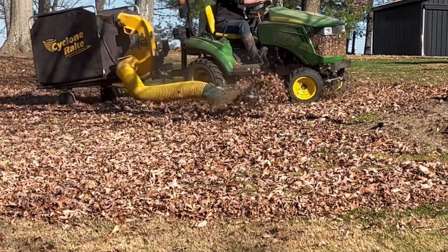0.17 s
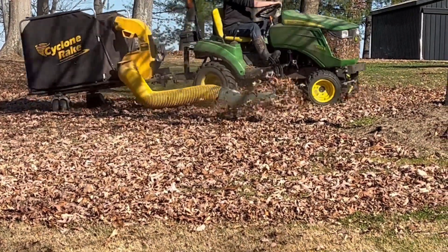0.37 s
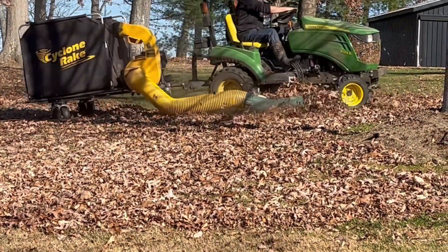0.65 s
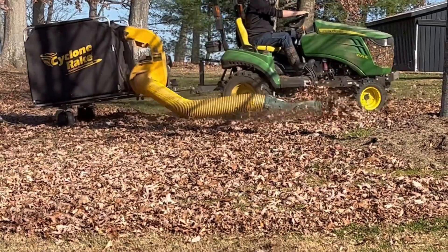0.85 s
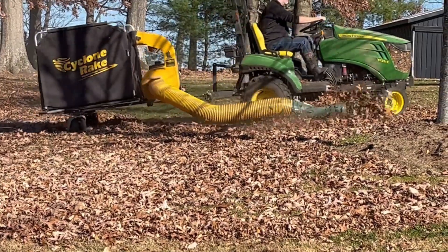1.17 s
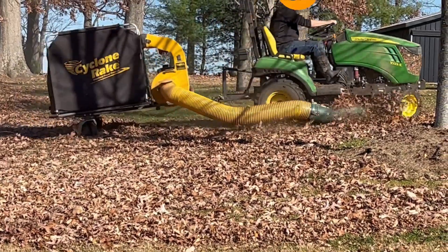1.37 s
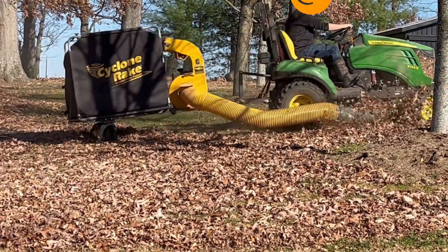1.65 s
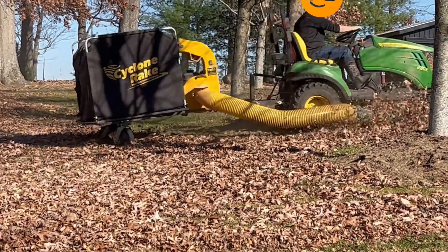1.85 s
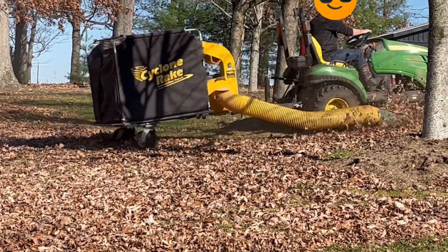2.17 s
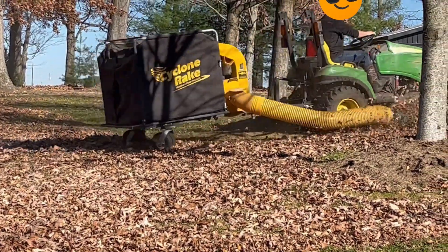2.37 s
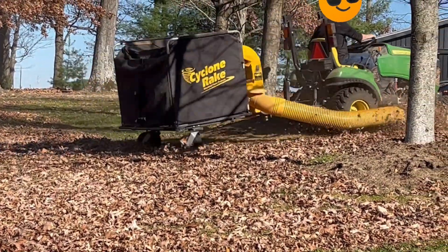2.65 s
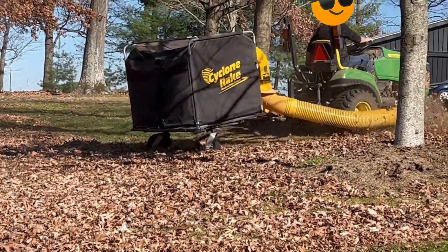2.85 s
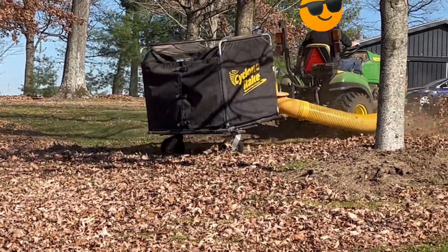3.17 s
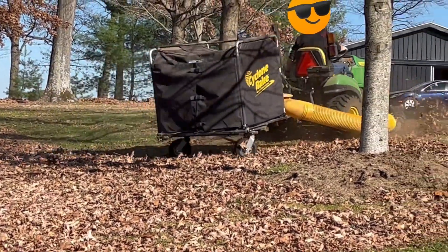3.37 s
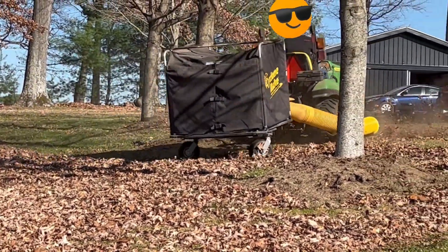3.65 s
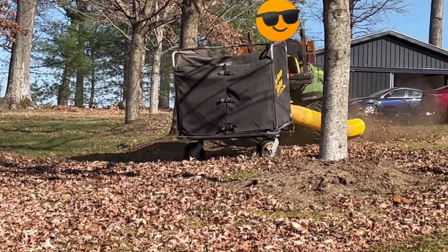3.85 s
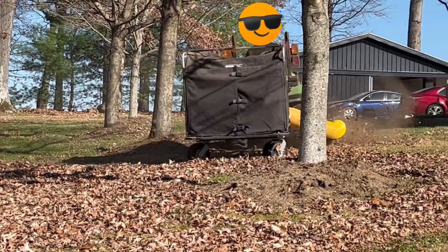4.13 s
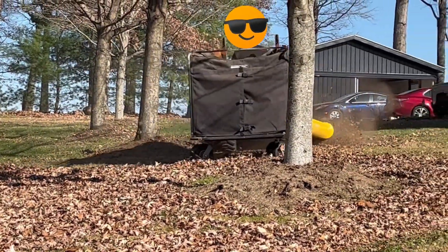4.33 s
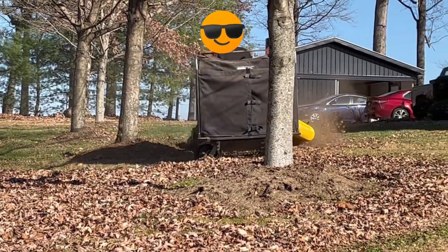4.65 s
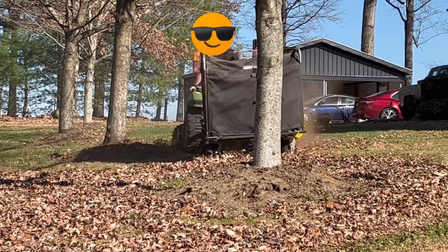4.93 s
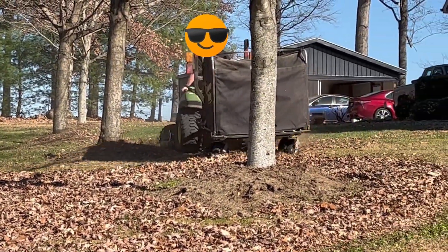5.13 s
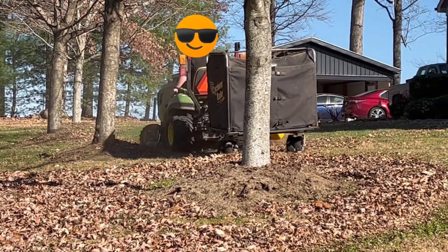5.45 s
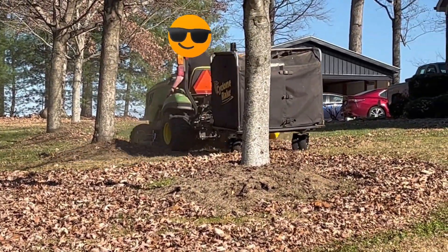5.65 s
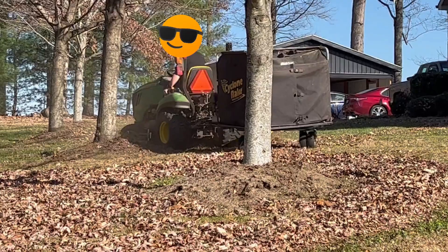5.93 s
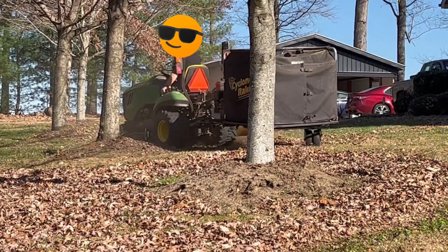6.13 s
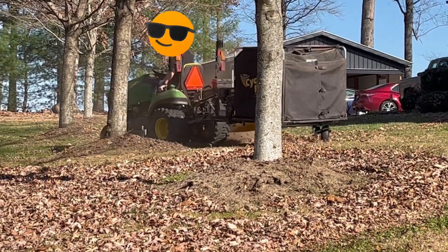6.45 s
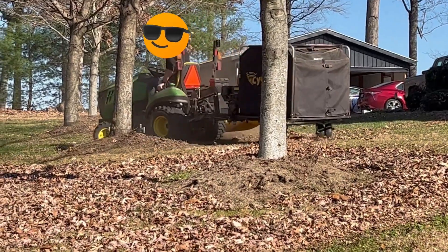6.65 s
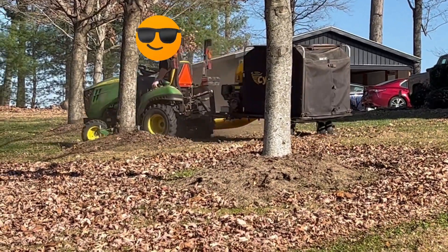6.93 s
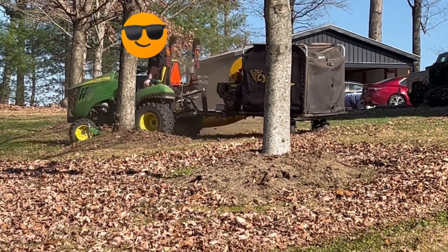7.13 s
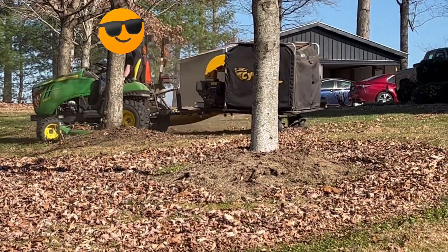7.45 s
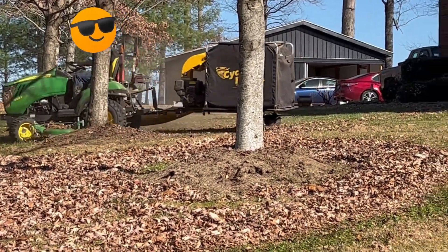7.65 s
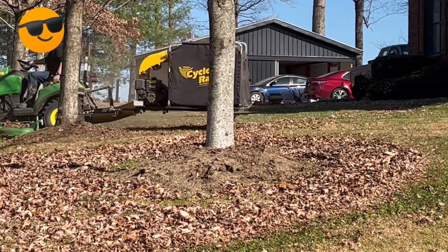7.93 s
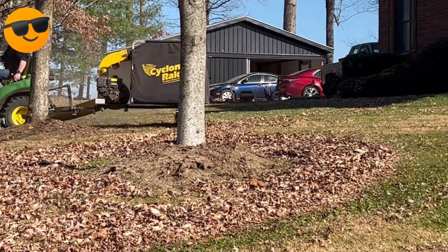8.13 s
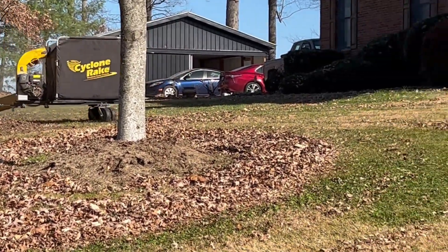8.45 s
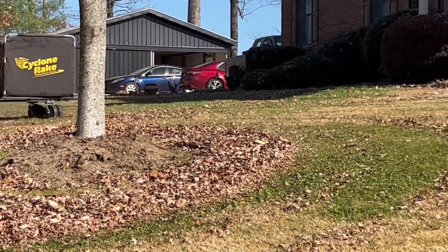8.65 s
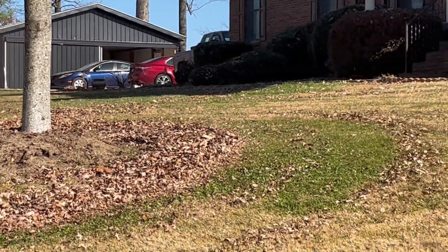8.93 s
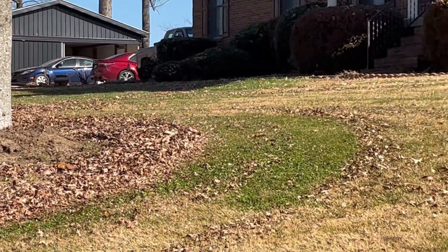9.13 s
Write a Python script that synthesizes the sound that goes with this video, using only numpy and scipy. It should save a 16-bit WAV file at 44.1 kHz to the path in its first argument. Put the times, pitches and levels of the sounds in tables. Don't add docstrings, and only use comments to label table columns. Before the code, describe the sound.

A lawn tractor towing a leaf vacuum drones and whooshes around a tree outdoors, dry leaves crackling, metal rattling, wind buffeting the microphone.

```python
import sys
import numpy as np
from scipy import signal
from scipy.fft import rfft, irfft, next_fast_len
from scipy.io import wavfile
from scipy.ndimage import uniform_filter1d, map_coordinates

SR = 44100
rng = np.random.default_rng(int(sys.argv[2]) if len(sys.argv) > 2 else 0)


def how_loud(loudness_db):
    steps = np.asarray(loudness_db, float) / 20
    return 10 ** steps


def generate_wav(sig):
    pcm = np.round(np.clip(np.atleast_2d(sig).T, -1, 1) * 32767).astype(np.int16)
    wavfile.write(sys.argv[1], SR, pcm)


N = 409688
TIME = np.arange(N) / SR


def turns():
    # t/s, blade pass f/Hz, vacuum firing f/Hz
    speed = [(0, 106.6, 29.02), (.71, 106.6, 29.044), (2.14, 106.15, 29.044), (3.3, 106.03, 29.04),
             (4.5, 106.25, 29), (5.72, 106.34, 29), (7.15, 107.02, 29.015), (7.86, 107.1, 29.033),
             (8.58, 107.41, 29.096), (9.29, 107.45, 29.213)]
    # t/s, lead/firings
    ahead = [(0, .63), (4.3, .6), (5.3, .83), (7.3, .98), (8.4, 1.15), (9.29, 1.4)]
    passes_per_firing = 1.352
    blade, vac = np.cumsum(curves(speed), axis=1) / SR
    return blade, blade / passes_per_firing + curves(ahead)[0], vac


def deck(blade):
    # t/s, level/dB
    first = [(0, -17.5), (.4, -23.5), (.75, -31.5), (1.3, -28), (1.95, -19.5), (2.4, -18), (2.95, -17.5),
             (3.5, -22), (3.97, -28), (4.5, -21.5), (5.45, -16), (6.4, -14.5), (6.8, -20.5), (7.35, -30.5),
             (7.7, -36.5), (8.1, -27), (9.29, -28)]
    # multiple, level above the 4th/dB
    upper = [(6, -14), (7, -20), (8, -17), (9, -14), (10, -18), (11, -19.5), (13, -12.5), (14, -16)]
    # multiple, middle t/s, length/s, peak level/dB
    in_step = [(2, 0.16, 0.61, -26), (2, 1.923, 0.63, -24), (2, 3.6, 0.15, -27), (2, 4.14, 0.58, -26.5),
               (2, 5.1, 0.88, -31), (2, 6.45, 0.59, -33), (2, 8.1, 0.45, -31.5), (3, 1.13, 0.71, -33),
               (3, 2.25, .3, -42), (3, 2.97, 0.29, -37.5), (3, 4.51, 0.81, -35), (3, 6.3, 0.42, -40.5),
               (3, 8.25, 0.61, -34.5), (4, 0.09, 0.44, -34), (4, 1.46, 0.64, -39.5), (4, 2.62, 0.34, -39.5),
               (4, 5.24, 0.27, -45), (4, 7.45, 0.9, -40.5), (4, 8.3, .5, -41), (5, .1, .4, -52),
               (5, 1.1, 0.33, -46), (5, 1.68, 0.5, -40.5), (5, 3.38, 0.47, -48), (5, 5.8, 1, -49),
               (5, 8.2, 0.28, -46), (4, 9.15, .2, -41), (2, 7.15, .5, -35.5), (2, 9.2, .2, -33.5),
               (2, 1.02, 0.44, -33), (2, 3.22, 0.24, -35), (6, 0.67, 0.27, -48), (6, 1.9, 0.61, -46),
               (6, 3.4, .15, -44.5), (6, 4, .2, -46.5), (6, 4.7, .3, -46.5), (6, 5.8, .15, -44),
               (8, 4.6, .14, -45), (8, 4.3, 0.18, -47), (8, 5.22, 0.24, -43.5), (9, 5.06, .4, -47),
               (9, 4.1, .8, -51)]
    out_of_step_db = [-39.5, -43, -60, -54]
    sides_db = [-28, -20, -14, -13, -10]

    size = {k + 2: how_loud(db) + 0 * TIME for k, db in enumerate(out_of_step_db)}
    for k, s, length, db in in_step:
        k = round(k)
        size[k] = np.maximum(size.get(k, 1e-5), how_loud(db) * swell(s, length))
    level_db = {k: 20 * np.log10(g) for k, g in size.items()}

    out = 0
    low_db = curves(first) + [level_db[k] for k in range(2, 6)]
    for k, (db, side_db) in enumerate(zip(low_db, sides_db), 1):
        out = out + tone(k * blade, db, flutter_db=0.5, side_db=side_db)
    for k, db in upper:
        follow_db = (low_db[3] - 39.0) / 2 + db + 3 * wobble(2.0)
        top_db = np.maximum(follow_db, level_db.get(round(k), -99))
        out = out + tone(k * blade, top_db, flutter_db=1.5, side_db=-6)
    return out


def diesel(fired):
    # t/s, level/dB
    exhaust = [(0, -21), (.7, -21), (1.4, -20.5), (2.3, -25.5), (2.7, -29.5), (3.5, -25.5), (4.2, -30.5),
               (4.6, -20.5), (5, -26.5), (5.5, -27), (5.85, -28), (6.5, -25.5), (7, -32), (7.5, -37),
               (7.9, -29.5), (9.29, -29)]
    # t/s, level/dB
    knocking = [(0, -41.5), (2, -44.5), (3.5, -58), (4.3, -56), (5.5, -60), (7, -46), (7.7, -41.5),
                (8.4, -39), (9.29, -38.5)]
    # f/Hz, width/Hz, level/dB
    block = [(2800, 120, 4.5), (3354, 160, 5), (3790, 680, 3.5), (4620, 1400, -3.5)]
    # (middle t/s, length/s, level/dB)
    panels = [(1388, 47, [(2.2, 0.93, -45), (7.3, 1.5, -46.5)]), (1501, 40, [(.9, 1.3, -49),
              (2.2, 0.37, -40), (2.85, 0.32, -48), (7.2, 1.3, -44)]), (1743, 53, [(.17, 0.54, -47),
              (1.6, 1.6, -55), (5.8, .5, -48), (7.1, 1.2, -45), (8.95, .8, -47)]),
              (1830, 27, [(1.3, 0.81, -55), (2.75, 0.26, -46)]), (1970, 240, [(5.3, 0.12, -41),
              (8.95, 1.1, -48)]), (2850, 45, [(.6, 1.2, -49), (5.9, .5, -59), (6.65, 0.27, -58),
              (7.05, .4, -53)]), (3390, 240, [(8.25, .55, -44), (8.68, 0.13, -43), (9.05, 0.37, -51)]),
              (3750, 260, [(5.9, 0.4, -54), (6.25, 0.45, -53), (7.85, 0.62, -45.5), (8.7, 0.56, -46),
              (9.25, 0.13, -41)]), (6250, 400, [(3.93, .15, -49)]), (6810, 350, [(3.76, .25, -45),
              (7.2, .67, -50.5), (8, 0.25, -48), (8.25, .5, -51)]), (7050, 270, [(.4, .27, -50),
              (6.2, 0.8, -48.5), (7.7, 0.39, -47), (9.05, 0.82, -47)])]

    knock_db, = curves(knocking)
    second_db = -37 + 0.44 * (knock_db - knock_db.mean()) + 1.3 * wobble(2.6)
    hum = tone(fired, curves(exhaust)[0], flutter_db=-1.3, side_db=-32)
    hum += tone(2 * fired, second_db, flutter_db=1.0, side_db=-35)
    hum += tone(3 * fired, second_db - 11.5, flutter_db=5.0, side_db=-15)

    knock = how_loud(knock_db) * spread(puffs(fired, sharp=0.73), modes(block))
    shake = spread(puffs(fired, sharp=3.3), lambda hz: 1)
    flecks = how_loud(2.2 * wobble(16))
    for hz, width, spells in panels:
        ring = signal.lfilter(*signal.iirpeak(hz, hz / width, SR), shake)
        ring = signal.lfilter(*signal.iirpeak(hz, hz / width / 2, SR), ring)
        facing = sum(how_loud(db) * np.exp(-(1.88 * (TIME - s) / length) ** 4) for s, length, db in spells)
        knock += flecks * unit(ring) * facing
    return hum + knock


def vacuum(fired):
    # t/s, tone level/dB, octave level/dB
    shaft = [(0, -36, -33), (1.16, -40, -31), (2, -33, -32), (2.9, -32, -40), (3.6, -29, -49),
             (4.3, -44, -45), (4.9, -42, -44), (5.4, -32, -42), (6, -31, -34), (6.8, -40, -37),
             (7.55, -45, -40), (8.3, -35, -40), (8.8, -32, -34), (9.29, -33, -30)]
    # multiple of firing, level/dB
    teeth = [(3, -47), (5, -18.5), (6, -27), (7, -20), (8, -29), (10, -33), (13, -35), (14, -36.5),
             (18, -40), (20, -46), (24, -57)]
    comb_db = -39 + 4 * wobble(1.595)
    shaft_db, octave_db = curves(shaft)
    out = tone(2 * fired, shaft_db, flutter_db=0.0, side_db=-22)
    out += tone(4 * fired, octave_db, flutter_db=-1.0, side_db=-30)
    for k, rel_db in teeth:
        out += tone(k * fired, comb_db / 2 + rel_db + 2 * wobble(1.96), flutter_db=-1.5, side_db=-36)
    return out


def whines(blade, fired):
    # t/s, level/dB
    pump_level = [(0, -57), (1.6, -52), (3.5, -55), (4.35, -54), (4.55, -46), (4.75, -49), (4.95, -55),
                  (5.2, -47), (5.6, -41.5), (5.92, -44), (6.08, -56), (6.8, -55), (6.95, -48), (7.45, -47),
                  (7.65, -56), (9.29, -55)]
    # t/s, level/dB
    gear_level = [(0, -52), (.6, -50), (1.1, -53), (1.3, -46), (1.6, -43), (1.95, -47), (2.2, -41.5),
                  (2.4, -46), (2.5, -70)]
    # t/s, f/Hz, level/dB
    squeal = [
        (5.94, 2250, -60),
        (5.96, 2290, -44),
        (5.985, 2360, -39),
        (6.01, 2450, -48),
        (6.05, 2380, -54),
        (6.09, 2370, -44),
        (6.125, 2440, -39),
        (6.175, 2430, -45),
        (6.2, 2430, -65),
    ]
    pump_beats, gear_beats = 7.81, 28.07
    pump = tone(pump_beats * blade + 0.04 * wobble(20), curves(pump_level)[0], flutter_db=1, side_db=-12)
    gear = tone(gear_beats * fired, curves(gear_level)[0], flutter_db=1.5, side_db=-27)
    belt_hz, belt_db = curves(squeal)
    belt_cycles = np.cumsum(belt_hz + 55 * wobble(220)) / SR
    belt = tone(belt_cycles, belt_db - 1 + 3 * wobble(60), flutter_db=1, side_db=-20)
    return pump + belt + gear


def rattles(fired):
    # t/s, peak level/dB, f/Hz
    raps = [(5.7145, -32, 3760), (5.7908, -35, 3710), (5.9559, -33, 3710), (6.0188, -34, 3730),
            (6.1086, -24.5, 3730), (6.2478, -32, 3770), (6.3236, -31, 3650), (6.4143, -28, 3680),
            (7.6117, -24, 3400), (7.6746, -29, 3660), (7.7508, -28, 3440), (7.9011, -25, 3820),
            (7.953, -25, 3790), (8.0403, -28, 3690), (8.0527, -25, 3850), (8.1281, -26, 3390),
            (8.4038, -30, 3350), (8.5551, -25, 3420), (8.617, -27, 3400), (8.6299, -27, 3810),
            (8.6668, -27, 3700), (8.7068, -22, 3390), (8.7796, -29, 3710), (8.8055, -26, 3710),
            (8.8553, -26, 3730), (8.8799, -25, 3770), (8.9173, -26, 3410), (8.9931, -27, 3350),
            (9.0181, -28, 3680), (9.0445, -28, 3370), (9.2071, -26, 3780), (5.8672, -33, 3710),
            (5.9186, -34, 3740), (5.9815, -33, 3730), (6.1346, -33, 3750), (6.1486, -31, 3730),
            (6.1725, -31, 3740), (6.2878, -32, 3730), (6.3002, -29, 3720), (6.606, -34, 3690),
            (6.6879, -35, 3690), (5.6837, -33, 2830), (5.9431, -28, 2830), (6.5537, -36, 2830),
            (6.5906, -33, 2780), (6.641, -30, 2790), (6.855, -29, 2780), (6.8919, -31, 2840),
            (7.0086, -30, 2850), (7.1169, -30, 2850), (7.1603, -30, 2800), (9.282, -23, 3740),
            (8.675, -25, 2740)]
    # t/s, peak level/dB, f/Hz
    clanks = [(7.5898, -24.5, 2150), (7.6202, -32, 1870), (8.18, -23, 2040), (8.2533, -32, 2060),
              (8.5581, -30, 1920), (8.6733, -22, 1770), (8.7766, -31, 1780), (8.8145, -29, 1750),
              (8.9093, -29, 1970), (9.1153, -27, 1960), (.03, -22.5, 1710), (.235, -24, 1740),
              (8.605, -25, 1760), (9.005, -28, 1790), (9.065, -28, 1720), (9.14, -24, 1770),
              (9.18, -22, 1750), (9.215, -24, 1680), (9.24, -25, 1780)]
    # t/s, peak level/dB, f/Hz
    ticks = [(5.8795, -39, 6850), (5.9569, -37, 6990), (6.0067, -39, 6940), (6.0826, -39, 7180),
             (6.097, -37, 6830), (6.1729, -39, 6880), (6.1973, -38, 7080), (6.2347, -38, 6910),
             (6.2622, -38, 7090), (6.2861, -37, 7010), (6.3255, -39, 7150), (6.337, -37, 7110),
             (6.3639, -35, 6890), (6.3754, -35, 6860), (6.4133, -33, 6860), (6.4782, -39, 6860),
             (6.5395, -40, 6960), (6.5735, -41, 6920)]
    # t/s, peak level/dB
    thuds = [
        (2.599, -13),
        (6.728, -14),
    ]
    # beats per firing, middle t/s, length/s, level/dB
    mesh = [(13.32, 1.9, .6, -50), (19.2, 1.9, .9, -49), (28, .6, .4, -50), (10.55, 2.1, .15, -45),
            (23.33, 1.5, .6, -50), (23.2, 2.8, .2, -47), (36.1, 7.05, .15, -50), (35.9, 5.75, .12, -50)]
    out = how_loud(-3.5) * struck(raps, t60=0.065)
    out += how_loud(-7) * struck(clanks, t60=0.17)
    out += how_loud(7.5) * struck(ticks, t60=0.02)
    out += struck([(s, db, 110) for s, db in thuds], t60=0.05)
    song = 0
    for k, s, length, db in mesh:
        song = song + swell(s, length) * tone(k * fired + 0.042 * wobble(14), db, flutter_db=2.5, side_db=-18)
    return out + song


def air(fired):
    # t/s, loss with distance/dB, shade of the bag/dB, load of leaves/dB
    path = [(0, -1, 1, -2.5), (1.3, 0, -1, -2.5), (2.56, -2, -0.5, -2), (3.3, -3, -1, 0),
            (3.75, -5.5, -1.5, 4.5), (4.1, -5, -3.5, -6), (4.6, -4, -5, 0.5), (4.85, -4.5, -3, 4),
            (5.1, -5.5, -0.5, 1), (5.4, -5, -1, 3.5), (5.9, -5.5, -0.5, -0.5), (6.5, -7, 0.5, -2.5),
            (7.5, -7, 1.5, -4), (8.3, -3.5, 0.5, -3), (8.9, -4.5, 1.5, -5), (9.29, -3.5, 0, -0.5)]
    # level/dB, share of the distance loss, share of the shade
    layers = [
        (-30.5, 0.67, 0.17),
        (-34.5, 1.05, 1.06),
        (-40.5, 0.5, 1.22),
        (-48, 0.78, 1.2),
    ]
    # f/Hz, level/dB per Hz
    rumble_shape = [(35, -30), (70, -9), (140, 1), (220, -1), (260, -35), (330, -54)]
    roar_shape = [(200, -40), (240, -13), (270, 0.5), (400, 1), (480, -6.5), (800, -7.5), (1100, -9.5),
                  (1500, -62)]
    whoosh_shape = [(600, -31), (850, -2), (1150, -2), (1500, -1.5), (1650, -2.5), (2200, -4), (2500, -10),
                    (3300, -31.5)]
    rush_shape = [(1800, -43), (2500, -0.5), (3000, -0.5), (4000, -3.5), (5500, -5), (6200, -7.5),
                  (7000, -5.5), (7600, -6.5), (8600, -17), (10000, -41)]
    hiss_shape = [(7500, -31), (9000, 7.5), (10000, 1), (11200, -5.5), (12500, -3), (13500, -7),
                  (15000, -3), (16500, -11)]

    away_db, shade_db, load_db = curves(path)
    roar_db, whoosh_db, rush_db, hiss_db = (db + far * away_db + hidden * shade_db for db, far, hidden in layers)
    rush_db = rush_db + 0.17 * load_db
    hiss_db = hiss_db + load_db
    throb = np.cos(2 * np.pi * fired) + 0.5 * np.cos(2 * np.pi * 2 * fired)
    surge = 0.75 * wobble(14) + 1.7 * wobble(45)
    out = how_loud(-32.5) * rush(rumble_shape, patchy_db=2.0)
    out += how_loud(roar_db - 1.0) * rush(roar_shape, patchy_db=0.75)
    out += how_loud(whoosh_db + 3 + 0.095 * surge) * rush(whoosh_shape, patchy_db=0.4)
    out += how_loud(rush_db + 5 + 0.75 * throb + 0.44 * surge) * rush(rush_shape, patchy_db=0.7)
    out += how_loud(hiss_db + 4.5 + 0.98 * throb + 0.67 * surge) * rush(hiss_shape, patchy_db=1.5)
    return out + leaves(hiss_db)


def leaves(hiss_db):
    # t/s, peak level/dB
    snaps = [(0.3301, -31), (1.4706, -35), (2.5885, -30), (3.256, -32), (3.9744, -41), (5.5473, -30),
             (6.816, -37), (.7781, -34), (5.3298, -36), (6.7401, -35), (6.7815, -37), (6.8493, -37),
             (6.98, -34), (7.3337, -34), (9.194, -37), (7.7882, -38), (7.9544, -34), (8.1778, -35),
             (8.317, -29), (8.9555, -31)]
    # t/s, peak level/dB
    twig = [
        (3.7224, -27),
        (3.7318, -23),
    ]
    crisp = lambda hz: how_loud(along([(1500, -30), (4000, -3), (8000, 0), (16000, -3)], hz))
    hits = np.zeros((2, N))
    rows = rng.random((9000, 3))
    at = (rows[:, 0] * N).astype(int)
    hits[:, at] = how_loud(-3.9 * np.log(1 - 0.998 * rows[:, 1:].T))
    crackle = how_loud(hiss_db - 3) * spread(hits, crisp)
    burst = np.zeros(N)
    for s, db in snaps + twig:
        burst[round(s * SR)] = how_loud(db - 1)
    decay = how_loud(-60 * TIME[:1500] / 0.012)
    burst = signal.fftconvolve(burst, decay)[:N]
    return crackle + burst * spread(rng.standard_normal((2, N)), crisp)


def clump():
    # t/s, level/dB
    wads = [
        (1.445, -30.5),
        (2.586, -25.5),
        (3.64, -37),
        (5.34, -37),
        (8.3, -35),
    ]
    shape = [(250, -30), (450, -3), (1000, 0), (2000, -2), (2500, -7), (5500, -10), (14000, -30)]
    crunch = 0
    for s, db in wads:
        since = np.clip(TIME - s, 0, None)
        crunch = crunch + how_loud(db) * (1 - np.exp(-since / 0.004)) * np.exp(-since / 0.085)
    grit = how_loud(2.4 * wobble(170))
    return grit * crunch * rush(shape, patchy_db=2)


def wind():
    # t/s, shared level/dB, left-right level/dB
    breeze = [(0, -30.5, -50), (2.4, -30, -51), (3, -36, -53), (4.5, -26, -47), (5.7, -34.5, -46),
              (6.5, -41, -52), (7.4, -31, -34), (7.9, -43, -40.5), (9.29, -35, -31.5)]
    # t/s, shared level/dB, left-right level/dB
    gusts = [(2.6, -26, -44), (2.74, -27, -44), (3.23, -26.5, -38), (3.68, -30, -41), (3.85, -25, -50),
             (4.16, -23.5, -50), (4.36, -30, -41), (4.53, -24, -32), (4.7, -27, -30), (4.87, -22.5, -47),
             (4.97, -25, -37), (5.27, -41, -31), (5.46, -23, -42), (5.68, -20.5, -35.5), (5.86, -19, -30),
             (6.22, -28, -41), (6.41, -25, -33), (6.735, -23, -41), (6.93, -28, -42), (7.18, -28, -36),
             (7.38, -34, -40), (7.57, -31, -33), (8.09, -40, -29), (8.5, -28, -28), (8.64, -27, -37),
             (8.78, -26, -36), (8.88, -24, -25.5), (9.1, -21, -32), (9.2, -30, -33)]
    # f/Hz, level/dB per Hz
    buffet = [(15, -30), (30, -8), (55, 11.5), (90, 10.5), (140, 2), (250, -6.5), (500, -47)]
    # f/Hz, level/dB per Hz
    eddies = [(15, -30), (40, -9), (90, 4), (180, -8.5), (300, -17.5), (500, -51)]
    shapes = lambda hz: how_loud([along(buffet, hz), along(eddies, hz), along(eddies, hz)])
    trio = filtered(rng.standard_normal((3, N)), shapes)
    shared, own, flap = trio / np.sqrt(np.abs(uniform_filter1d(trio ** 2, size=2600)) + 1e-9)
    pushes = sum(how_loud(row[1:])[:, None] * swell(row[0], 0.075) for row in gusts)
    both, apart = how_loud(curves(breeze)) + pushes
    push = both * how_loud(-2.5 + 0.72 * wobble(25)) * shared
    push = push + apart * how_loud(-0.5) * flap
    return push + apart * how_loud(-6.0 + 1.6 * wobble(25)) * own * np.array([[1], [-1]])


def unit(x):
    return x / np.sqrt(np.mean(x ** 2) + 1e-20)


def along(points, hz):
    f, v = np.transpose(points)
    return np.interp(np.log(hz + 1), np.log(f + 1), v)


def curves(rows):
    s, *cols = np.transpose(rows)
    return [np.interp(TIME, s, c) for c in cols]


def wobble(rate):
    return map_coordinates(rng.standard_normal(int(N * rate / SR) + 4), [TIME * rate])


def swell(s, length):
    return np.exp(-((TIME - s) / length) ** 2)


def filtered(x, response):
    m = next_fast_len(N + 8192)
    return irfft(rfft(x, m) * response(np.fft.rfftfreq(m, 1 / SR)), m)[..., :N]


def spread(pair, gain):
    # f/Hz, likeness
    alike = [(60, .996), (250, .985), (500, .95), (800, .9), (1200, .85), (1550, .6), (2100, .985),
             (4000, .99), (5100, .995), (6000, .9), (7500, .9), (8500, .995), (9800, .86), (11200, .99),
             (12400, .93), (13500, .74), (15300, .97)]
    turn = lambda hz: np.arccos(np.clip(along(alike, hz), -1, 1)) / 2
    mid, side = filtered(pair, lambda hz: gain(hz) * np.array([np.cos(turn(hz)), np.sin(turn(hz))]))
    return unit(np.array([mid + side, mid - side]))


def rush(spectrum, patchy_db):
    z = signal.stft(rng.standard_normal((2, N)), nperseg=512)[2]
    field = uniform_filter1d(rng.standard_normal(z.shape[1:]), 5, 0)
    field = uniform_filter1d(field, 14, 1)
    pair = signal.istft(z * how_loud(patchy_db * unit(field)), nperseg=512)[1][:, :N]
    return spread(pair, lambda hz: how_loud(along(spectrum, hz)))


def tone(cycles, db, flutter_db, side_db):
    phase = 2 * np.pi * (cycles + rng.random())
    stray = how_loud(side_db) * np.sin(phase + 2 * wobble(1.4))
    level = np.sqrt(2) * how_loud(db + flutter_db * wobble(9))
    return level * (np.sin(phase) + np.array([stray, -stray]))


def puffs(cycles, sharp):
    size = how_loud(0.79 * rng.standard_normal(int(cycles[-1]) + 2))[cycles.astype(int)]
    return size * np.exp(-sharp * (cycles % 1)) * rng.standard_normal((2, N))


def modes(table):
    def response(f):
        total = 0
        for k, (c, w, db) in enumerate(table):
            total = total + (-1) ** k * how_loud(db) * 1j * f * w / (c * c - f * f + 1j * f * w)
        return total
    return response


def struck(rows, t60):
    out, t = np.zeros(N + SR), TIME[:SR // 8]
    for (s, db, hz), (near, turn) in zip(rows, rng.random((60, 2))):
        ring = np.sin(2 * np.pi * hz * t)
        ring += 0.5 * np.sin(2 * np.pi * (hz * (0.97 + 0.058 * near) * t + turn))
        out[round(s * SR):][:len(t)] += how_loud(db - 60 * t / t60) * (1 - np.exp(-t / 0.0016)) * ring
    return out[:N]


def scene():
    blade, fired, vac = turns()
    machines = deck(blade) + diesel(fired) + vacuum(vac) + whines(blade, fired) + rattles(fired)
    return machines + air(vac) + clump() + wind()


def roll_off(x):
    return signal.sosfilt(signal.butter(12, 15620, fs=SR, output="sos"), x)


def record(dry):
    # f/Hz, left lead/radians
    lead = [(0, 0), (400, 0), (1200, -.15), (1900, .2), (3200, .4), (4200, 0), (5100, -.1), (5700, -.95),
            (6500, -1), (8250, -3.05), (8850, -3.25), (11100, -6.1), (12500, -6.4), (14900, -9.3),
            (16000, -9.5)]
    # f/Hz, left minus right level/dB
    tilt = [(60, -.2), (200, -.5), (380, .5), (700, 0), (1300, -1.8), (2400, -.6), (4400, 0), (15000, 0)]
    top_hz = 15830
    half = lambda hz: how_loud(along(tilt, hz) / 2) * np.exp(0.5j * np.interp(hz, *np.transpose(lead)))
    lag = lambda hz: np.exp(-0.5j * 2.16 * np.exp(-((hz - 1380) / 560) ** 2))
    aside = swell(9.15, 0.9)
    from_side = filtered(dry, lambda hz: np.array([lag(hz), 1 / lag(hz)]))
    heard = (1 - aside) * dry + aside * from_side
    mix = filtered(heard, lambda hz: np.array([half(hz), 1 / half(hz)]) * (hz < top_hz))
    return roll_off(mix)


dry = scene()
out = record(dry)
generate_wav(out)
```